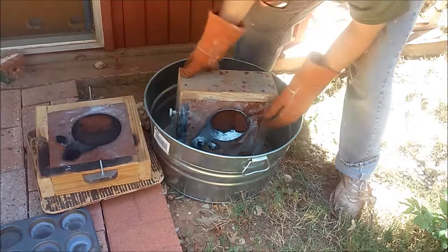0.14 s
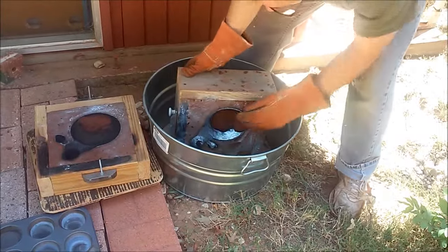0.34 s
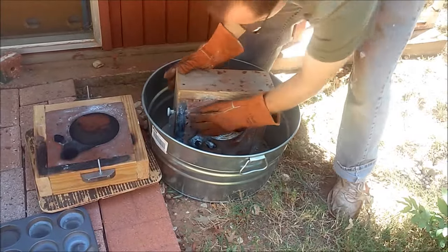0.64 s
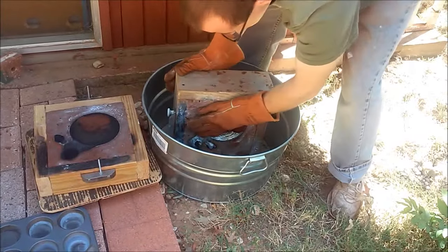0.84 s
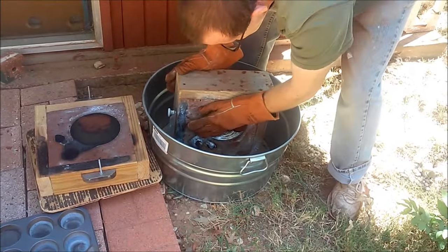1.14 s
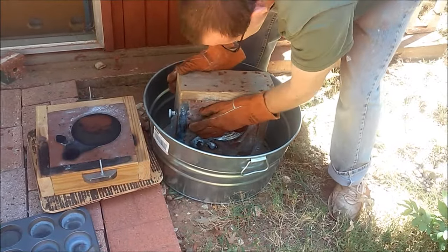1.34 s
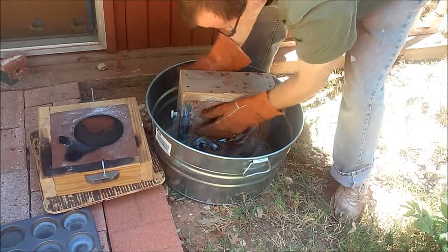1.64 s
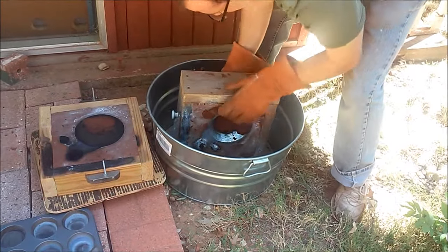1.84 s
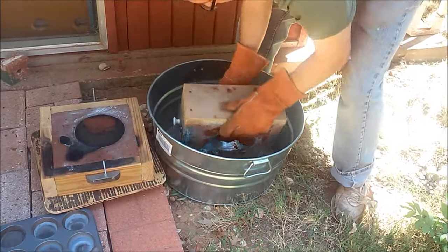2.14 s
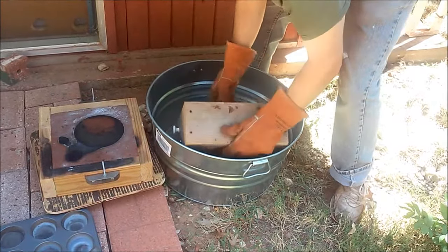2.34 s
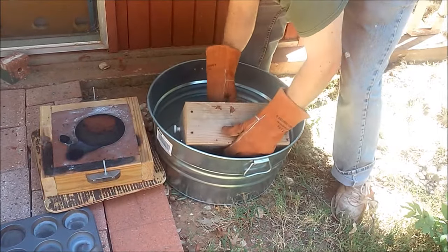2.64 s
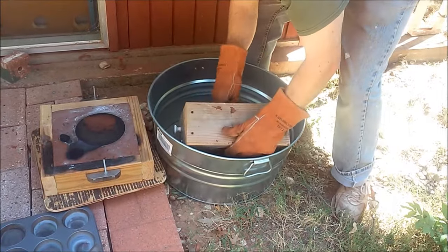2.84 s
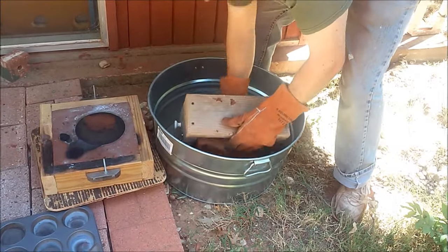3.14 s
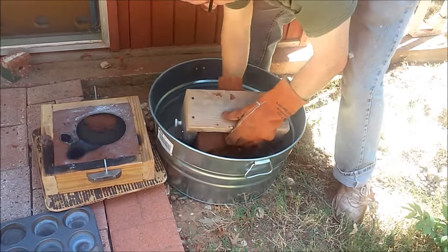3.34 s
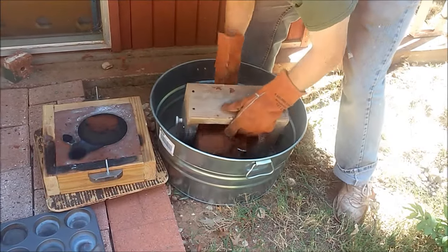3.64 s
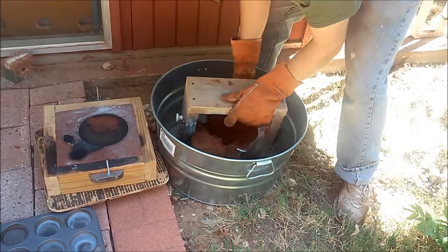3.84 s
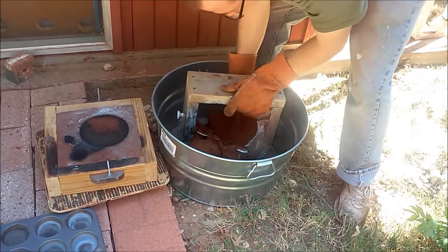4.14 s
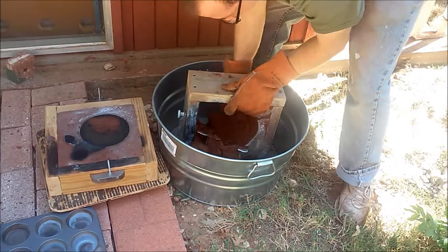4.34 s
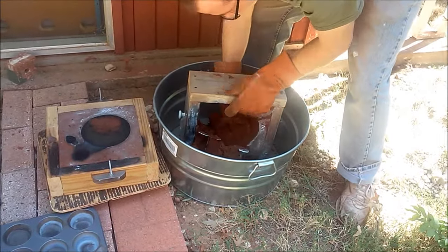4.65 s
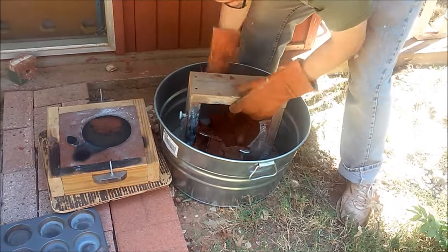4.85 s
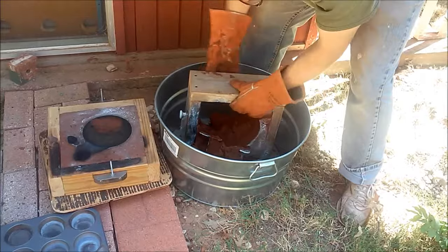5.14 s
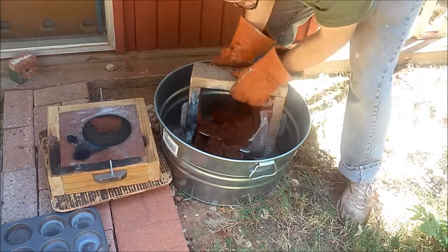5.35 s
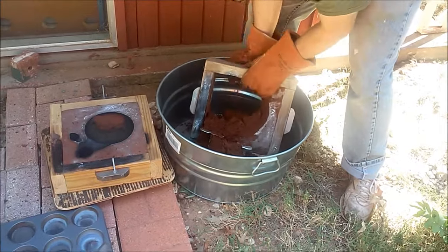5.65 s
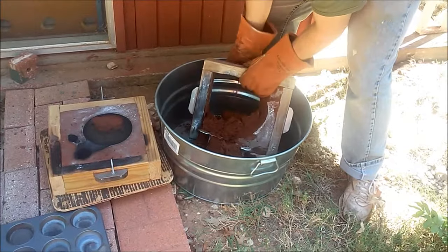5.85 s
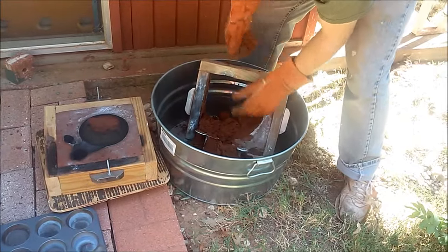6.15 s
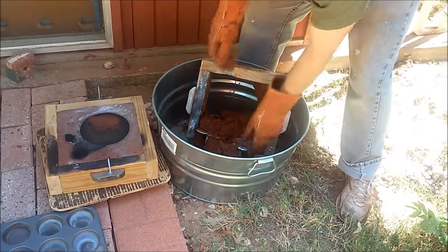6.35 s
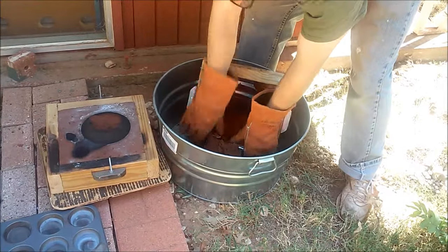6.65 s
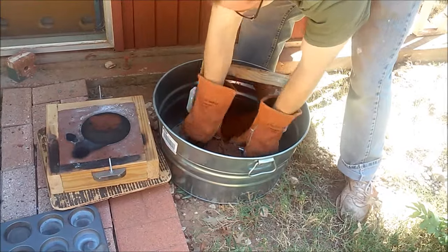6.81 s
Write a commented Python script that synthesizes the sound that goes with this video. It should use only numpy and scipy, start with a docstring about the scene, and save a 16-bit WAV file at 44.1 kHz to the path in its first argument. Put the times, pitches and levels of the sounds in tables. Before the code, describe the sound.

A close outdoor microphone hears damp sand being worked loose from a wooden frame in a steel tub. From 0 to 0.2 s small bright clinks and a brush of sand, then faint hissing. Around 1.1-1.4 s a light tick and soft gritty scraping; near 2.0 s another small scrape and tap. At 2.53-2.6 s coarse grinding bursts out, a metal clink at 2.68, then a low thud with a hollow wood knock at 2.8. A tick at 3.2 leads to the loudest crash at 3.28-3.4: deep tub boom and harsh rasp, with a thin high steel ring lingering. Sand hisses down; light taps and knocks at 3.6-4.0, a dull thump at 4.29, a tick at 4.43. Thumps return at 5.18, with small knocks after, then heavier thuds, wood and scrape at 5.7-5.85. Sand trickles out into quiet air by 7 s.

```python
"""A wooden flask of damp foundry sand is worked loose in a steel tub in a backyard, heard close by.
Fittings clink and gloves push through hissing sand at first; then grit grinds on the wall, wood knocks.
From 2.5 s lumps thud on the bottom; strokes and blows peak near 3.3 s, and one steel fitting sings on.
A second burst of thuds comes between 5.1 and 5.9 s, then sand trickles out over still air.
Noise grains make grit and sand, resonators wood and steel; a faint wash answers from tub and house wall."""
import sys
import numpy as np
from scipy import signal
from scipy.fft import rfft, irfft, next_fast_len
from scipy.io import wavfile

SR = 44100
rng = np.random.default_rng(int(sys.argv[2]) if len(sys.argv) > 2 else 0)


def inscribe(sig):
    """Save sig as 16-bit PCM at rate SR to the path in sys.argv[1].

    A 1-D sig is mono; a 2-D sig holds one channel per row.
    Samples are clipped to [-1, 1] before scaling.
    """
    pcm = np.round(np.clip(np.atleast_2d(sig).T, -1, 1) * 32767)
    wavfile.write(sys.argv[1], SR, pcm.astype(np.int16))


N = 307818

# Flask grinding on sandy steel. Each row: peak time in seconds, relative rasp level in dB,
# swell time in seconds, fine hiss relative to the rasp in dB.
SCRAPE_STROKES = [(1.15, -57.5, .03, 16), (1.195, -50, .04, 10), (1.265, -54.5, .025, 10.5),
                  (1.37, -48, .025, 7.5), (1.761, -69, 0.021, 14.5), (2.018, -39.5, .011, 3),
                  (2.535, -26.5, .009, -7), (2.572, -19, .026, -8), (2.596, -17, .014, -2),
                  (2.679, -29, .002, 0), (2.82, -17, .013, -6.5), (3.292, -15, .013, -5),
                  (3.316, -11, .023, -5), (3.358, -11, .018, 0.5), (3.386, -15, .04, -7.5),
                  (3.92, -55, 0.025, 15), (4.299, -38.5, .012, 1.5), (5.34, -50, .019, -2),
                  (5.724, -42.5, .003, 7.5), (5.777, -38.5, .005, 9), (5.847, -27, 0.013, -5.5)]
# Hiss of the finest grit on steel. Each row: frequency in Hz, relative level in dB.
FINE_HISS_SPECTRUM = [(2000, -35.5), (6000, -20), (8800, -17), (10500, -3.5), (12300, 0.5), (14500, -3.5),
                      (16000, -12.5)]
# Low drone of the loaded tub. Each row: frequency in Hz, relative level in dB.
DRONE_SPECTRUM = [(25, -26), (65, -12.5), (90, -6.5), (170, -5), (245, 3), (340, -4.5), (440, -8),
                  (600, -14.5), (800, -27.5), (2000, -48.5)]


def from_db(db):
    """Amplitude factor of a level in dB."""
    return 10 ** (np.asarray(db) / 20)


def rms_one(x):
    """Scale a signal to rms 1."""
    return x / np.sqrt(np.mean(x ** 2) + 1e-20)


def since(s):
    """Seconds since the moment s, negative before it."""
    return np.arange(N) / SR - s


def coloured(x, spectrum):
    """Filter a steady signal by a spectrum, drawn straight over log frequency; rms 1."""
    hz, level_db = np.transpose(spectrum)
    size = next_fast_len(len(x))
    bins_hz = np.maximum(np.arange(size // 2 + 1) * SR / size, 1)
    gain = from_db(np.interp(np.log(bins_hz), np.log(hz), level_db))
    return rms_one(irfft(rfft(x, size) * gain, size)[:len(x)])


def drift(per_s):
    """Slow random wander: straight lines between per_s normal draws a second."""
    knots = rng.standard_normal(4000)
    return np.interp(since(0) * per_s, np.arange(len(knots)), knots)


def grains(spread_db, clump_db):
    """Countless tiny fractures of uneven size that come in clumps."""
    size_db = spread_db * rng.standard_normal(N)
    return rng.standard_normal(N) * from_db(size_db + clump_db * drift(400))


def resonance(x, hz, t60):
    """One mode with gain 1 at its top; it rings down 60 dB in t60 seconds."""
    r = from_db(-60 / (t60 * SR))  # pole radius
    zeros = np.array([1, 0, -1]) * (1 - r * r) / 2
    poles = [1, -2 * r * np.cos(2 * np.pi * hz / SR), r * r]
    return signal.lfilter(zeros, poles, x + 1e-18)


def dying(t, t60):
    """Full until t = 0, then 60 dB down per t60."""
    return np.exp(-np.minimum(np.log(1000) * np.maximum(t, 0) / t60, 40))


def blow(t, load_s, t60):
    """Builds up while the contact lasts, then dies."""
    return np.clip(t / load_s, 0, 1) * dying(t - load_s, t60)


def add(out, s, sound):
    """Mix a short sound in at time s."""
    start = max(round(s * SR), 0)
    out[start:start + len(sound)] += sound[:N - start]


def scrapes():
    """Each stroke crushes grit against the wall: a coarse rasp, a fine hiss and a drone of the whole tub."""
    # Coarse grit on the wall. Each row: frequency in Hz, relative level in dB.
    grit_spectrum = [(350, -19), (560, 3.5), (740, -7), (1000, 0.5), (1350, -6.5), (2200, -3), (3100, -0.5),
                     (4500, -3), (6500, -5.5), (8300, -18), (11000, -21), (16000, -23.5)]
    settle_t60_s = 0.18  # the grit comes to rest after each stroke
    # relative drone under a 0 dB stroke; dB of drone per dB of rasp
    drone_db, drone_follows = -6.5, 0.83
    rasp_power, hiss_power, drone_power = np.zeros((3, N))
    for s, level_db, swell_s, hiss_db in SCRAPE_STROKES:
        t = since(s)
        swell = np.exp(-(np.minimum(t, 0) / swell_s) ** 2)
        stroke = swell * dying(t, settle_t60_s)
        rasp_power += (from_db(level_db) * stroke) ** 2
        hiss_power += (from_db(level_db + hiss_db) * stroke) ** 2
        drone_power += (from_db(drone_db + drone_follows * level_db) * stroke) ** 2
    crushing = grains(spread_db=4, clump_db=2.8)
    rasp = from_db(-2.5) * np.sqrt(rasp_power) * coloured(crushing, grit_spectrum)
    hiss = from_db(-1.5) * np.sqrt(hiss_power) * coloured(crushing, FINE_HISS_SPECTRUM)
    drone = np.sqrt(drone_power) * coloured(rng.standard_normal(N), DRONE_SPECTRUM)
    return rasp + hiss, drone


def thumps():
    """The sand-laden bottom swings at a pitch set by where it is hit, while the lump crumbles on it."""
    # Dull blows on the tub bottom. Each row: start in seconds, relative level in dB,
    # pitch in Hz, 60 dB decay time in seconds.
    bottom_blows = [(1.553, -60.5, 217, .35), (2.002, -43, 258, 0.25), (2.1, -46.5, 254, .2),
                    (2.25, -50.5, 95.4, 0.4), (2.54, -24, 109.7, 0.55), (2.595, -17, 256, 0.017),
                    (2.789, -12, 245, 0.089), (2.812, -11.5, 130, 0.12), (2.854, -18.5, 251.5, 0.15),
                    (3.236, -32, 321, .28), (3.284, -1.5, 241, 0.05), (3.294, -4, 338.5, 0.083),
                    (3.36, -31, 314, 0.099), (3.77, -38, 249.5, 0.34), (3.82, -32.5, 248.4, 0.22),
                    (3.984, -36, 264, 0.22), (4.02, -30, 254, 0.29), (4.285, -17, 221, .17),
                    (4.44, -35, 232, .16), (4.932, -39.5, 142, 0.14), (5.136, -26, 215, 0.15),
                    (5.178, -15.5, 283.5, 0.15), (5.18, -20, 154, .14), (5.268, -27, 255, 0.064),
                    (5.554, -29.5, 264.6, 0.063), (5.649, -34, 223, .16), (5.715, -12.5, 209, 0.13),
                    (5.728, -10, 208, 0.079), (5.796, -8.5, 237, 0.028), (5.812, -23, 220, 0.23)]
    load_s = .005  # a soft lump takes this long to load the bottom
    out, t = np.zeros(N), np.arange(SR) / SR
    for s, level_db, hz, t60 in bottom_blows:
        swing = np.sin(2 * np.pi * hz * t)
        crumble = from_db(-8.5) * coloured(rng.standard_normal(SR), DRONE_SPECTRUM)
        add(out, s, from_db(level_db) * blow(t, load_s, t60) * (swing + crumble))
    return out


def tub(x, modes):
    """The sheet steel rings on in its modes."""
    return sum(from_db(level_db) * resonance(x, hz, t60) for hz, level_db, t60 in modes)


def knocks(load_s=.002, cycles=6.0, t60_s=0.073):
    """Wood stuttering over the sand: noise through one heavily damped mode, applied twice for steeper sides,
    makes a hollow tock."""
    # The frame knocking and creaking. Each row: start in seconds, relative level in dB, pitch in Hz.
    frame_knocks = [(.133, -46.5, 1030), (1.128, -43.5, 1450), (1.991, -51, 700), (2.512, -43, 685),
                    (2.788, -25, 567), (3.075, -45.5, 480), (3.131, -46.5, 800), (3.565, -47, 895),
                    (3.825, -42, 480), (3.866, -47.5, 1350), (3.984, -52, 1150), (4.002, -35, 957),
                    (4.026, -45, 802), (4.431, -46, 1303), (4.988, -61.5, 1050), (5.177, -42, 910),
                    (5.31, -50, 910), (5.345, -49.5, 960), (5.713, -33, 860), (5.716, -24.5, 430),
                    (6.17, -62, 2700), (6.385, -67.5, 800)]
    out, t = np.zeros(N), np.arange(SR // 2) / SR
    for s, level_db, hz in frame_knocks:
        stutter = resonance(rng.standard_normal(len(t)), hz, cycles / hz)
        wood = rms_one(resonance(stutter, hz, cycles / (2 * hz)))
        add(out, s, from_db(level_db) * blow(t, load_s, t60_s) * wood)
    return out


def clinks(load_s=0.0042):
    """A brief chatter of hard contacts: a bright tick and one well-damped ring."""
    # Fittings and grit tapping the steel. Each row: start in seconds, relative tick level in dB,
    # ring frequency in Hz, relative ring level in dB.
    steel_taps = [(.06, -58, 13500, -48), (.127, -46, 11400, -42), (0.133, -33, 3660, -44.5),
                  (.134, -56, 11360, -27), (.172, -35.5, 11200, -44), (1.128, -36, 3500, -55),
                  (2.004, -40, 3940, -49), (2.352, -44.5, 5410, -76), (2.676, -26, 3244, -30.5),
                  (3.177, -42.5, 3500, -55.5), (3.201, -28, 3430, -42), (3.585, -34.5, 5000, -52),
                  (3.915, -31.5, 5800, -44), (4.432, -33.5, 4240, -51.5), (5.324, -34.5, 4574, -49.5)]
    decay_cycles = 210  # every clink dies within the same number of swings, so high ones are shorter
    out, t = np.zeros(N), np.arange(SR // 2) / SR
    for s, tick_db, hz, ring_db in steel_taps:
        tick = coloured(rng.standard_normal(len(t)), FINE_HISS_SPECTRUM)
        ring_t60 = 16 / hz
        chatter = resonance(rng.standard_normal(len(t)), hz, ring_t60)
        ring = rms_one(resonance(chatter, hz, ring_t60))
        contact = from_db(tick_db) * tick + from_db(ring_db) * ring
        add(out, s, blow(t, load_s, decay_cycles / hz) * contact)
    return out


def fitting():
    """Solid steel keeps singing after the crash has gone: a few decaying sines."""
    # Modes of one fitting. Each row: frequency in Hz, relative level in dB, 60 dB decay time in seconds.
    fitting_modes = [(8769, -35, 0.49), (11200, -28, .22), (12120, -27, .38)]
    t = since(3.356)
    out = np.zeros(N)
    for hz, level_db, t60 in fitting_modes:
        out += from_db(level_db) * (t > 0) * dying(t, t60) * np.sin(2 * np.pi * hz * t)
    return out


def across_tub(x, count=3):
    """The round wall throws back faint close echoes whose paths change as the hands move: a hollow colour."""
    out, t = x.copy(), since(0)
    for mean_lag_s in np.geomspace(.0007, .003, count):
        lag_s = mean_lag_s * from_db(2.5 * drift(1.5))
        out += from_db(-16) * np.interp(t - lag_s, t, x)
    return out


def sand_flow(start_s):
    """Every push and every scrape sets sand sliding: it builds up, runs while driven, then trickles out."""
    # Gloves pushing through loose sand. Each row: start in seconds, length in seconds, relative level in dB.
    glove_pushes = [(-.1, 0.094, -47.5), (.12, 0.06, -50.5), (0.713, 0.13, -71.5), (0.947, 0.032, -54),
                    (1.09, 0.11, -53), (1.83, 0.34, -64.5), (2.315, 0.075, -55.5), (3.138, 0.13, -42.5),
                    (3.815, 0.23, -46), (4.207, 0.26, -48), (4.953, 0.046, -55), (5.078, 0.062, -52),
                    (5.152, 0.19, -47), (5.504, 0.24, -51.5), (5.734, 0.088, -35), (6.73, .2, -72.5),
                    (6.934, .05, -53.5)]
    # sand shed by a 0 dB scrape; dB of sand per dB of rasp; how long it pours
    slide_db, slide_follows, slide_s = -36.5, .46, 0.13
    trickle_t60_s = 0.95  # the same pace for every slide

    def slide(s, length_s, level_db):
        t = since(s)
        return from_db(level_db) * np.clip(t / start_s, 0, 1) * dying(t - length_s, trickle_t60_s)

    pushed = np.max([slide(*push) for push in glove_pushes], axis=0)
    shed = np.max([slide(s, slide_s, slide_db + slide_follows * level_db)
                   for s, level_db, _, _ in SCRAPE_STROKES], axis=0)
    return np.hypot(pushed, shed)


def rustle():
    """Damp sand slides in a fine, even hiss; the tub's murmur builds more slowly as sand gathers on it."""
    # Sliding sand. Each row: frequency in Hz, relative level in dB.
    sand_spectrum = [(300, -19.5), (1000, -2.5), (2000, -10), (4000, -11), (6500, -10), (8700, -9),
                     (10500, -1.5), (12500, 2.5), (14500, -2.5), (16000, -12.5)]
    # Tub murmuring under the sand. Each row: frequency in Hz, relative level in dB.
    murmur_spectrum = [(20, 4.5), (50, 7), (110, 7), (180, 0.5), (245, 6.5), (350, -5), (700, -10.5),
                       (1000, -12), (1500, -26.5), (3500, -35.5), (8000, -46)]
    sliding = grains(spread_db=3, clump_db=.8)
    shifting = grains(spread_db=2, clump_db=1.5)
    hiss = from_db(-2.5) * sand_flow(start_s=0.044) * coloured(sliding, sand_spectrum)
    murmur = from_db(-1) * sand_flow(start_s=0.12) * coloured(shifting, murmur_spectrum)
    return hiss + murmur


def wash(x, t60=0.69, build_s=0.075):
    """Diffuse echoes between tub, paving and house wall: convolution with swelling, dying noise."""
    # Colour of the echoes. Each row: frequency in Hz, relative level in dB.
    wash_spectrum = [(60, 1), (250, -4), (500, 1.5), (1000, 1.5), (3000, -13), (6000, -10.5), (9000, -2.5),
                     (13000, 0.5)]
    t = np.arange(2 * SR) / SR
    response = coloured(rng.standard_normal(len(t)), wash_spectrum) * blow(t, build_s, t60)
    return signal.fftconvolve(x, response / np.sqrt(np.sum(response ** 2)))[:N]


def still_air():
    """The quiet yard: steady noise, strongest in the bass."""
    # Colour of the yard. Each row: frequency in Hz, relative level in dB.
    air_spectrum = [(20, -1.5), (120, -15), (300, -28), (1000, -30), (3000, -34), (16000, -33.5)]
    return from_db(-69) * coloured(rng.standard_normal(N), air_spectrum)


def scene():
    """Blows and strokes ring through the tub, over rustling sand and still air."""
    # Modes of the steel wall. Each row: frequency in Hz, relative level in dB, 60 dB decay time in seconds.
    wall_modes = [(900, 2.5, 0.057), (1550, -2.5, 0.052), (2721, -5.5, 0.13), (2810, 1, 0.066),
                  (2980, 7.5, .12), (3320, 5.5, .05), (3440, 3.5, 0.066), (3660, -6, .15), (3970, 2, 0.12),
                  (4430, 2.5, 0.036), (5249, 5.5, 0.19), (5800, 0, 0.11), (6880, 0.5, 0.16)]
    # Modes of the tub bottom. Each row: frequency in Hz, relative level in dB, 60 dB decay time in seconds.
    bottom_modes = [(87, -10.5, 0.54), (123, -13.5, 0.23), (160, -9.5, 0.12), (248, 0.5, 0.22),
                    (312, -1, 0.39), (620, -16.5, .16), (872, -24.5, .25)]
    rasp, drone = scrapes()
    load = drone + thumps()
    wall = rasp + from_db(-5.5) * tub(rasp, wall_modes)
    bottom = from_db(-2.0) * load + from_db(-7.5) * tub(load, bottom_modes)
    work = across_tub(wall + knocks() + clinks()) + bottom + fitting()
    return (work + from_db(-21.5) * wash(work) + rustle() + still_air())[None]


def record(dry):
    """The microphone chain rounds the loudest peaks and cuts the top steeply."""
    rounded = 1.233 * np.tanh(dry / 1.383)
    cutoff_hz, ripple_db, stop_db = 15900, .2, 80
    top_cut = signal.ellip(12, ripple_db, stop_db, cutoff_hz, fs=SR, output="sos")
    return signal.sosfilt(top_cut, rounded)


dry = scene()
out = record(dry)
inscribe(out)
```